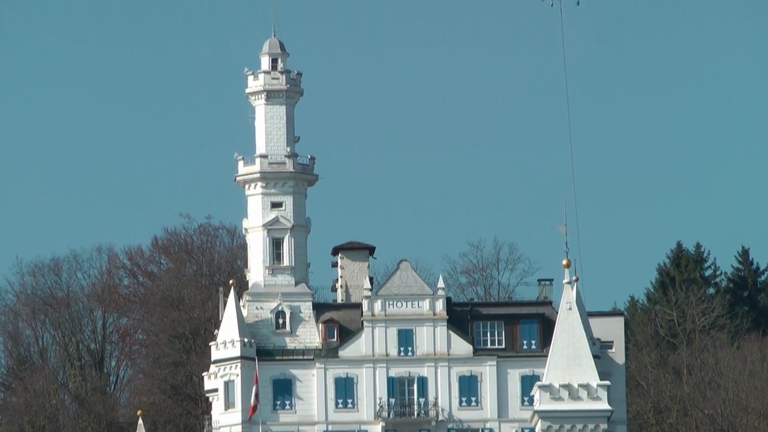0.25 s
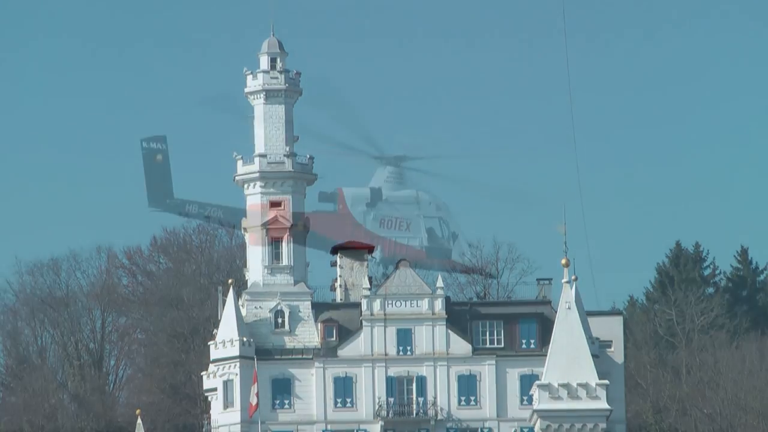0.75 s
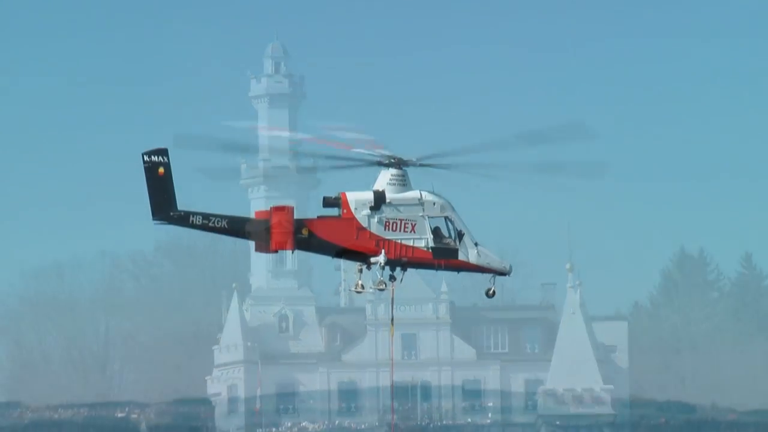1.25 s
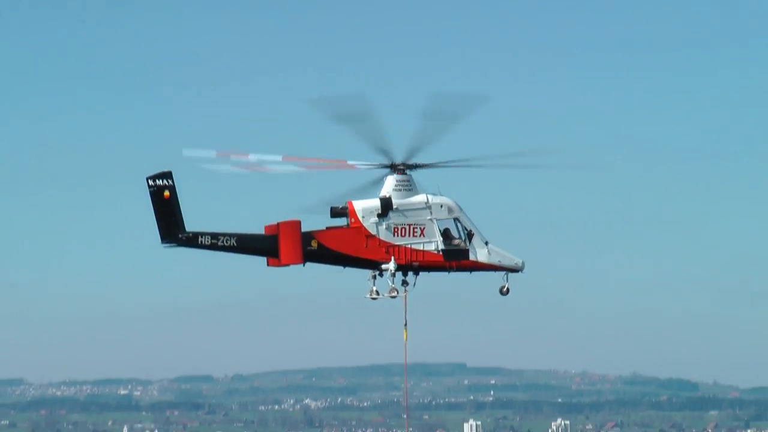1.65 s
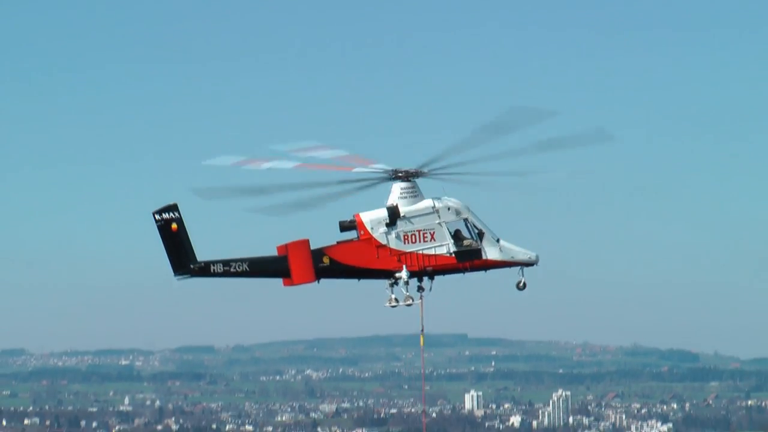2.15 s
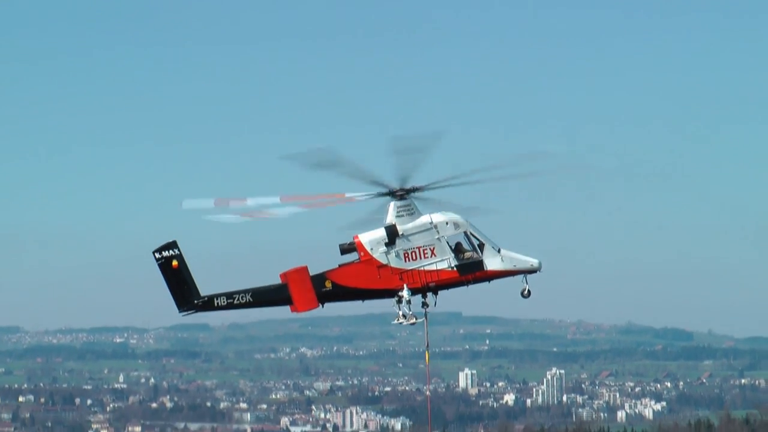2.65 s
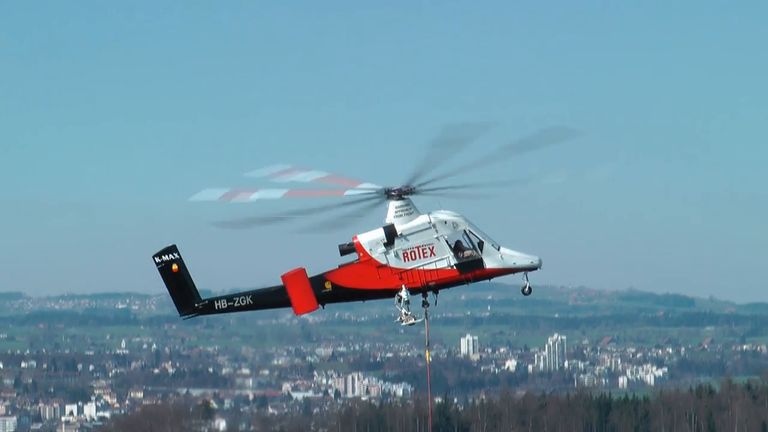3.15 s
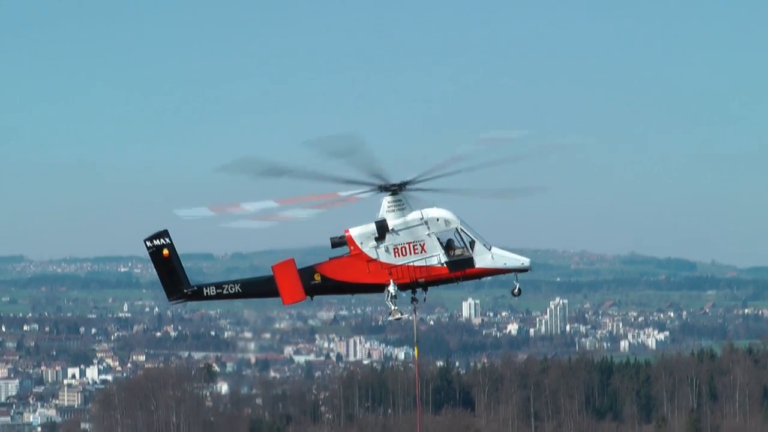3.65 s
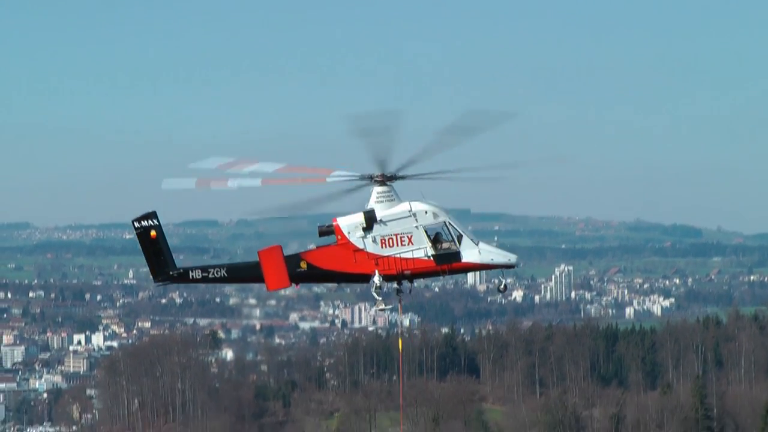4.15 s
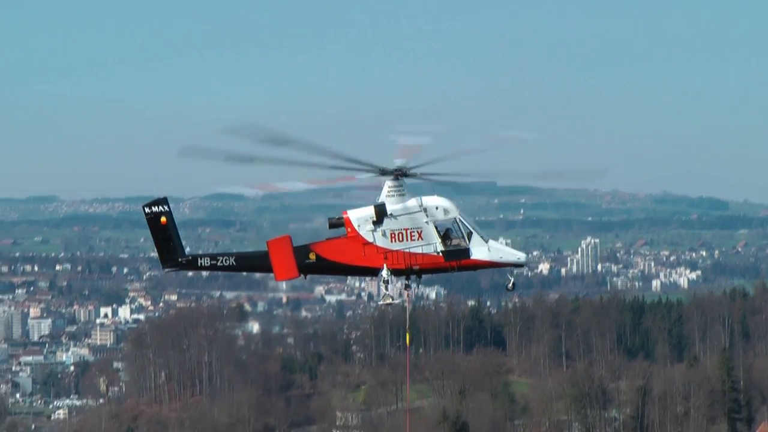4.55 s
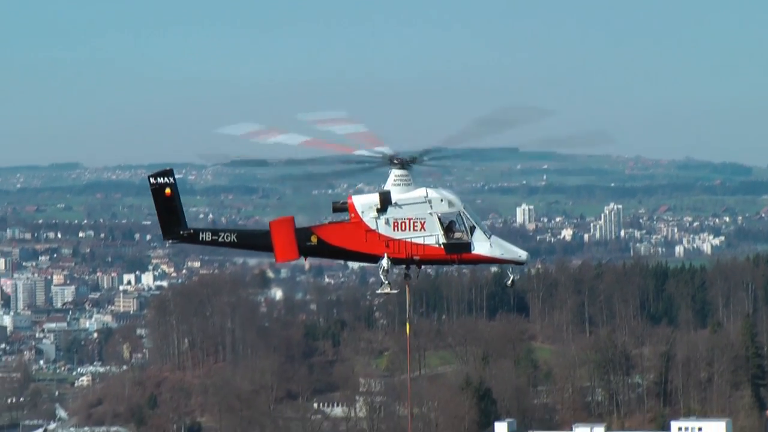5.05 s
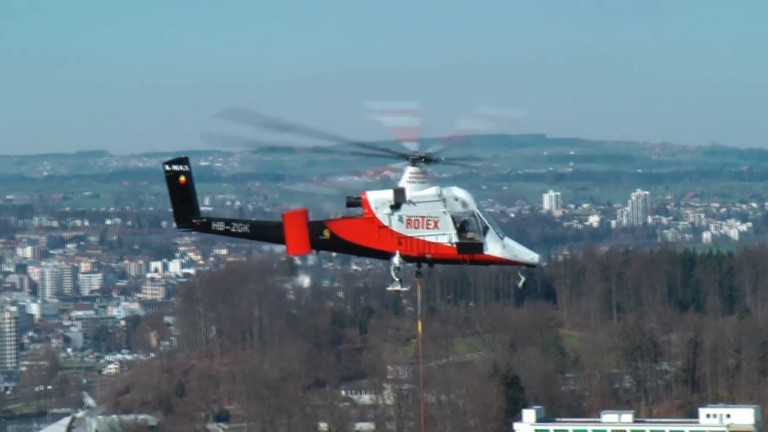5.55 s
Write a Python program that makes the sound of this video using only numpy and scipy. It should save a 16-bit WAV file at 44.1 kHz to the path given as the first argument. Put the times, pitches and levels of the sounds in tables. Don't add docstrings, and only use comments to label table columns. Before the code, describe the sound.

The first 0.02 seconds carry a scrap of louder, midrange noise, then a quiet, dull wash of a distant helicopter remains. Soft low thumps come at about 0.4 to 0.7 seconds, and between 0.3 and 0.7 a small bird gives thin high whistles and two short harsh chirps. Meanwhile a nearer view fades in, and from 0.7 to 2 seconds the rotor sound grows strongly. Throbs in the low mids come roughly sixteen to eighteen times a second, crossed by blunt, woody blade slaps about nine or more a second, slightly irregular in timing and strength. Around them lies broad turbulent roar and airy turbine hiss, brightest near 1.8 to 2.3 seconds, with brief hiss gusts near 2.1, 3.0, 4.2, 4.5 and 5.5. From 2 seconds to the end at 5.8 the hover stays loud and even, with intermittent deep thumps, a dull hillside echo and fairly narrow outdoor stereo.

```python
import sys
import numpy as np
from scipy import signal
from scipy.fft import rfft, irfft, next_fast_len
from scipy.io import wavfile
from scipy.ndimage import uniform_filter1d

SR = 44100
rng = np.random.default_rng(int(sys.argv[2]) if len(sys.argv) > 2 else 0)


def magnitude_from_level(level_db):
    exponent = np.asarray(level_db, float) / 20
    return 10 ** exponent


def file_out(sig):
    cols = np.atleast_2d(sig).T
    lim = np.clip(cols, -1, 1)
    pcm = np.round(lim * 32767).astype(np.int16)
    wavfile.write(sys.argv[1], SR, pcm)


N = 256265
PASS_HZ = 8.905


def at_hz(points, hz, column=1):
    return np.interp(np.log(hz), np.log(np.array(points)[:, 0]), np.array(points)[:, column])


def total_db(spectrum, low, high):
    return 10 * np.log10(np.sum(magnitude_from_level(at_hz(spectrum, np.arange(low, high))) ** 2))


def drift(rate):
    r = np.exp(-80 * np.pi * rate / SR)
    noise = rng.standard_normal(N // 40 + 2002)
    slow = signal.lfilter([1], [1, -2 * r, r * r], noise)[2000:]
    return np.interp(np.arange(N) / 40, np.arange(len(slow)), slow / slow.std())


def resonate(x, hz, width_hz):
    r = np.exp(-np.pi * width_hz / SR)
    poles = [1, -2 * r * np.cos(2 * np.pi * hz / SR), r * r]
    return signal.lfilter(np.array([1, 0, -1]) * (1 - r * r) / 2, poles, x)


def bird():
    # start in seconds, length in seconds, start pitch in Hz, end pitch in Hz, level in dB; the rows
    # at 0.437 s and 0.59 s give the chirps' falling lower stroke
    whistles = [(.292, .016, 5400, 5000, -58), (.325, .013, 5200, 4950, -59), (.36, 0.1, 5200, 4500, -65),
                (.495, 0.028, 3670, 3800, -56), (.545, 0.029, 3770, 3780, -58),
                (.585, 0.024, 4200, 4600, -55), (.604, 0.022, 4500, 3900, -52),
                (.63, .022, 4400, 4450, -60), (.437, 0.033, 2140, 1530, -48), (.59, .032, 2130, 1500, -47),
                (.586, .014, 3320, 3020, -51), (.655, 0.031, 3467, 3500, -53)]
    # start in seconds, length in seconds, start and end of the fundamental in Hz, level in dB
    chirps = [
        (.436, .022, 1080, 860, -51),
        (.587, .02, 1080, 900, -50),
    ]
    out = np.zeros(N)
    waver = 1 + 0.019 * drift(56.0)
    for notes, partials in (whistles, [1]), (chirps, [2, 3, 4, 5, 6]):
        for s, length, start_hz, end_hz, level_db in notes:
            here = slice(round(s * SR), round((s + length) * SR))
            count = here.stop - here.start
            turns = np.cumsum(np.linspace(start_hz, end_hz, count) * waver[here]) / SR
            tone = sum((partials[0] / k) ** 2.0 * np.sin(2 * np.pi * k * turns) for k in partials)
            envelope = np.hanning(count) ** .5 * np.linspace(1, .5, count)
            out[here] += magnitude_from_level(level_db) * envelope * tone
    return out


def hillside_echo(beats):
    dull = signal.lfilter([.1], [1, -.9], beats)
    return np.roll(dull, round(0.027 * SR)) * magnitude_from_level(-12.0) * [[1.3], [.5]]


def far_view(hz):
    # frequency in Hz, far spectrum in dB per Hz
    far_spectrum = [(15, -39.5), (35, -10), (65, -6), (125, -17), (280, -21), (430, -10.5), (550, -19.5),
                    (1100, -15), (2000, -27), (5000, -49), (7200, -71), (8600, -42.5), (10300, -45),
                    (13400, -90)]
    # time in seconds, far level in dB
    far_level = [(0, -42.5), (.3, -43.5), (.6, -43), (.9, -46), (1.1, -44), (1.4, -45.5)]
    # frequency in Hz, spectrum of the opening view in dB per Hz
    opening_spectrum = [(35, -54), (200, -27), (480, 6.5), (2000, -4.5), (4500, -29), (9000, -44)]
    opening_db, opening_s = -31, 0.021
    t = np.arange(N) / SR
    far_db = np.interp(t, *np.transpose(far_level)) - total_db(far_spectrum, 15, 13000)
    ending = np.clip((opening_s - t) / 0.0025, 0, 1)
    opening = ending * magnitude_from_level(opening_db - total_db(opening_spectrum, 35, 9000))
    return [magnitude_from_level(at_hz(far_spectrum, f) + far_db) ** 2 + (opening * magnitude_from_level(at_hz(opening_spectrum, f))) ** 2
            for f in hz]


def near_levels(t):
    # time in seconds, blade hiss in dB, turbine hiss against blade hiss in dB
    hiss_course = [(.45, -48, -23), (.7, -47.5, -9), (.95, -48, -1.5), (1.2, -38.5, -4), (1.5, -35.5, -5.5),
                   (1.8, -30, -8), (2.1, -31, -7), (2.4, -32.5, -5), (2.72, -34.5, -5.5),
                   (2.95, -31.5, -8.5), (3.25, -37, -3.5), (3.7, -35.5, -9.5), (3.86, -34.5, -5),
                   (4.15, -37, -6), (4.5, -32.5, -5.5), (5.1, -35, -8), (5.5, -32, -7.5), (5.81, -37.5, -3)]
    # time in seconds, gain in dB, length in seconds
    exhaust_gusts = [(1.71, 3, 0.028), (2.142, 5, 0.2), (2.932, 5.5, 0.063), (3.035, 6, 0.055),
                     (4.195, 6.5, .05), (4.387, 4.5, 0.077), (4.516, 7, 0.04), (5.544, 4, 0.089)]
    s, hiss, turbine = np.transpose(hiss_course)
    hiss, turbine = np.interp(t, s, hiss), np.interp(t, s, turbine)
    gust = sum(db * np.exp(-8 * ((t - at) / length) ** 2) for at, db, length in exhaust_gusts)
    roar = -36.5 - 9 * np.exp(-np.maximum(t - 1, 0) / 0.63)
    bass = -47.5 + 0 * t
    return [bass, roar, hiss + 0.11 * gust, hiss + turbine + gust]


def near_view(hz, shares):
    # frequency in Hz, near spectrum in dB per Hz
    near_spectrum = [(15, -44.5), (30, -29), (86, 2.5), (150, -7.5), (213, 0), (431, -4.5), (1070, -7),
                     (1440, -7.5), (4380, -18), (6720, -23.5), (8300, -36.5), (10300, -53), (13400, -60)]
    # frequency in Hz, depth once a pass in dB, depth twice a pass in dB
    pass_swell = [(80, -0.2, 1), (300, 0.5, 1), (1100, 0, -0.2), (4500, 1, 0.7)]
    swell_turns = [0.19, 0.033]
    fade_in_s = [0.15, 0.91]
    t = np.arange(N) / SR
    spans = [(40, 130), (150, 500), (600, 1800), (2500, 7500)]   # Hz, heard as bass, roar, two hisses
    excess = np.array([level - total_db(near_spectrum, *span)
                       for level, span in zip(near_levels(t), spans)])
    fade = np.interp(t, fade_in_s, [0, 1]) ** 2
    once, twice = [np.cos(2 * np.pi * k * (PASS_HZ * t - swell_turns[k - 1])) for k in (1, 2)]
    powers = []
    for f, share in zip(hz, shares):
        swell = at_hz(pass_swell, f) * once + at_hz(pass_swell, f, column=2) * twice
        powers.append(fade * magnitude_from_level(at_hz(near_spectrum, f) + share @ excess + swell) ** 2)
    return powers


def wash(shared_db, own_db):
    region_hz = [80, 300, 1100, 4500]
    # frequency in Hz, left-right likeness from 0 to 1
    likeness = [(60, .85), (210, 0.95), (770, 0.95), (2750, .95), (6500, 0.92), (8000, 0.2)]
    edges = 22 * 2 ** np.arange(0, 9, 1 / 3)
    centres = np.sqrt(edges[:-1] * edges[1:])
    shares = np.transpose([np.interp(np.log(centres), np.log(region_hz), row) for row in np.eye(4)])
    gusts = [drift(5.7) + 0.76 * drift(65.0) for _ in region_hz]
    white = rng.standard_normal((2, 2, N))
    views = zip(near_view(centres, shares), far_view(centres))
    out = 0
    for k, (near, far) in enumerate(views):
        flicker = magnitude_from_level(shared_db * (shares[k] @ gusts) + own_db * drift(17.3))
        band = signal.butter(2, edges[k:k + 2], "band", fs=SR, output="sos")
        mid, side = signal.sosfilt(band, white[k % 2])
        alike = np.clip(at_hz(likeness, centres[k]), 0, 1)
        pair = np.sqrt(1 + alike) * mid + np.sqrt(1 - alike) * side * [[1], [-1]]
        out = out + np.sqrt((near + far) * SR / 4) * flicker * pair
    return out


def passes(spells, jitter_s, spread_db):
    rows = np.array([(s, level_db) for first, last, level_db in spells
                     for s in np.linspace(first, last, round((last - first) * PASS_HZ) + 1)])
    return rows + rng.standard_normal(rows.shape) * [jitter_s, spread_db]


def thumps(gain_db, hz, width_hz):
    # first pass in seconds, last pass in seconds, level in dB
    loaded_spells = [(.098, .325, -49), (.408, .495, -30), (.558, .692, -28), (1.118, 1.235, -35),
                     (1.418, 1.762, -36), (1.57, 1.798, -37), (2.03, 2.474, -38), (2.207, 2.437, -26),
                     (2.876, 3.549, -28.5), (3.776, 3.999, -32.5), (4.11, 4.443, -46), (4.71, 4.71, -32),
                     (4.905, 5.244, -27), (5.292, 5.537, -27)]
    events = passes(loaded_spells, jitter_s=0.0044, spread_db=1.0)
    clicks = np.zeros(N)
    clicks[[round((s - .01) * SR) for s, db in events]] = magnitude_from_level(events[:, 1] + gain_db)
    unit = resonate(resonate(np.eye(1, 4000)[0], hz, width_hz), hz, width_hz)
    pushes = resonate(resonate(clicks + 1e-18, hz, width_hz), hz, width_hz)
    return pushes / np.abs(unit).max()


def pulses(events, gain_db, spread_s, width, count):
    size = 2048
    out = np.zeros(N + size)
    chance = rng.standard_normal((len(events), 2, count))
    for (s, level_db, hz), (lags, sizes) in zip(events, chance):
        clicks = np.eye(1, size, 600)[0] * 1.5
        np.add.at(clicks, np.clip(600 + lags * spread_s * SR, 0, 1400).astype(int), sizes)
        burst = resonate(resonate(clicks, hz, width * hz), hz, 2 * width * hz)
        loudness = uniform_filter1d(burst ** 2, size=200)
        start = round(s * SR) - loudness.argmax()
        out[start:start + size] += magnitude_from_level(level_db + gain_db) * burst / np.sqrt(2 * loudness.max())
    return out[:N]


def slaps():
    # time in seconds, level in dB, centre in Hz
    vortex_hits = [(0.849, -42, 660), (0.927, -41, 964), (0.962, -38, 950), (1.075, -34.5, 700),
                   (1.124, -32, 910), (1.258, -30, 1040), (1.409, -29.5, 755), (1.454, -26, 1120),
                   (1.631, -27.5, 1030), (1.698, -30, 1110), (1.752, -29, 950), (1.805, -26, 855),
                   (1.868, -26, 860), (2.02, -23.5, 1040), (2.132, -23.0, 730), (2.249, -29, 1110),
                   (2.356, -31, 980), (2.465, -25, 840), (2.578, -25, 940), (2.693, -26, 950),
                   (2.806, -24.5, 860), (2.915, -23.5, 634), (2.96, -25.5, 910), (3.026, -21.5, 726),
                   (3.11, -26.5, 1010), (3.145, -20.5, 1090), (3.256, -21, 900), (3.339, -31.5, 666),
                   (3.373, -24, 964), (3.485, -28, 970), (3.601, -23.5, 820), (3.668, -33, 700),
                   (3.873, -26.0, 807), (3.928, -36.5, 740), (3.987, -29, 854), (4.068, -29, 750),
                   (4.102, -28, 930), (4.176, -28, 855), (4.213, -30.5, 980), (4.438, -28.5, 830),
                   (4.514, -33, 1140), (4.601, -28.5, 650), (4.661, -26.5, 900), (4.72, -31, 890),
                   (4.79, -29.0, 890), (4.827, -27.0, 780), (4.886, -28.0, 884), (5.006, -26.5, 800),
                   (5.11, -29.5, 840), (5.222, -28, 740), (5.334, -24.5, 960), (5.386, -26.5, 676),
                   (5.446, -24.0, 960), (5.561, -33, 990), (5.611, -25.5, 750), (5.676, -23, 850),
                   (5.725, -30, 863), (5.785, -28.5, 805)]
    return pulses(vortex_hits, gain_db=-0.2, spread_s=.0042, width=.6, count=10)


def throbs():
    # time in seconds, level in dB, centre in Hz
    throb_events = [(.43, -41, 206), (.465, -38.5, 231), (.525, -39, 170), (.56, -55, 165), (.59, -38, 163),
                    (0.679, -39, 220), (0.747, -37, 220), (0.806, -34.5, 258), (0.866, -41, 240),
                   (0.933, -52, 255), (0.963, -36, 338), (1.015, -34.5, 237), (1.076, -37.5, 342),
                   (1.125, -34, 248), (1.17, -30, 280), (1.236, -30, 318), (1.289, -35, 319.5),
                   (1.319, -37.5, 290), (1.35, -27.5, 345), (1.412, -34, 290), (1.464, -34, 269),
                   (1.493, -40, 330), (1.524, -32, 330), (1.575, -29.0, 323), (1.617, -36, 290),
                   (1.648, -33.5, 300), (1.689, -23, 372), (1.727, -34.0, 310), (1.756, -24.5, 300),
                   (1.804, -28.5, 334), (1.868, -33, 270), (1.914, -27, 304), (1.952, -28, 277),
                   (2.034, -28, 250), (2.098, -33, 280), (2.144, -28.5, 312), (2.176, -32, 280),
                   (2.205, -29, 300), (2.248, -26.5, 336), (2.313, -28, 250), (2.354, -26, 340),
                   (2.411, -33.5, 320), (2.475, -28, 258), (2.535, -26, 250), (2.59, -37, 249),
                   (2.638, -39, 318), (2.666, -35, 333), (2.7, -25, 222), (2.756, -29.0, 250),
                   (2.817, -32, 270), (2.862, -30, 300), (2.896, -28, 220), (2.955, -31, 292),
                   (2.989, -26.5, 300), (3.032, -29.5, 243), (3.093, -29, 238), (3.14, -31, 350),
                   (3.22, -28.5, 368), (3.261, -34, 250),
                    (3.312, -27.5, 290), (3.365, -27.5, 271), (3.442, -32, 237), (3.477, -22.5, 278),
                      (3.539, -26.5, 310), (3.601, -24.5, 253), (3.631, -27.5, 350), (3.668, -27.5, 318),
                      (3.705, -30, 360), (3.763, -29.0, 260), (3.815, -25.5, 291), (3.85, -27.5, 318),
                      (3.929, -21.5, 370), (3.991, -23.5, 262), (4.073, -28, 338), (4.103, -28.5, 252),
                      (4.187, -27.5, 266), (4.215, -24.5, 239), (4.292, -23, 337), (4.333, -32, 232.3),
                      (4.408, -25, 320), (4.446, -26, 215), (4.508, -27.5, 278), (4.547, -30.5, 217),
                      (4.624, -28, 268), (4.654, -26, 237), (4.688, -36, 332), (4.736, -25.5, 290),
                      (4.781, -29, 232), (4.832, -27, 277), (4.886, -25.5, 300), (4.939, -24, 300),
                      (5.0, -27, 270), (5.072, -25, 260), (5.11, -25, 280), (5.17, -28.5, 290),
                      (5.222, -28.5, 310), (5.278, -30, 300), (5.336, -27, 280), (5.394, -32, 277),
                      (5.44, -25.0, 313), (5.505, -27, 248.8), (5.565, -25, 280), (5.611, -30, 300),
                      (5.727, -21.5, 360), (5.793, -27, 323)]
    events = throb_events
    return pulses(events, gain_db=0.1, spread_s=.004, width=.45, count=4)


def scene():
    beats = throbs() + slaps() + thumps(gain_db=-5.5, hz=82, width_hz=73)
    return wash(shared_db=0.9, own_db=1.07) + bird() + beats + hillside_echo(beats)


def low_pass(x):
    return signal.sosfilt(signal.butter(12, 10460, fs=SR, output="sos"), x)


def record(dry):
    # centre in Hz, width in Hz, gain in dB
    peaks_and_dips = [(103, 49, 3.5), (124.4, 21.5, -10), (208.4, 51, 4.5), (379, 105, 2.5), (418, 34, -2),
                      (537, 40, 2), (604, 102, 3), (1040, 33, 2.5), (1170, 146, 1.5), (1715, 31, 0.5),
                      (2130, 71, 2.5), (1396, 130, -1.5), (4420, 1720, 3), (5290, 650, -7),
                      (8570, 1260, -6)]
    # frequency in Hz, left over right in dB
    capsule_tilt = [(60, -0.5), (170, 1.5), (460, 0.5), (1280, -0.5), (3550, -2), (9860, 0.5)]
    # frequency in Hz, lead of left over right in radians
    capsule_lead = [(0, 0), (1290, -0.29), (1550, -0.3), (4650, -0.0), (5680, 0.1), (9990, -0.0)]
    size = next_fast_len(N)
    hz = np.maximum(np.arange(size // 2 + 1) * SR / size, 1)
    colour = magnitude_from_level(sum(db * np.exp(-2 * ((hz - centre) / width) ** 2)
                     for centre, width, db in peaks_and_dips))
    half = magnitude_from_level(at_hz(capsule_tilt, hz) / 2) * np.exp(.5j * at_hz(capsule_lead, hz))
    picked = irfft(rfft(dry, size) * colour * np.array([half, 1 / half]), size)[:, :N]
    return low_pass(picked)


dry = scene()
out = record(dry)
file_out(out)
```